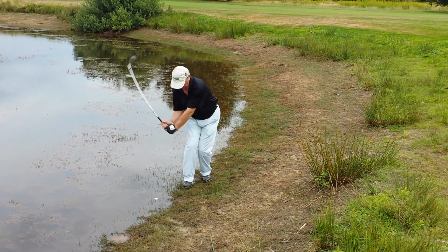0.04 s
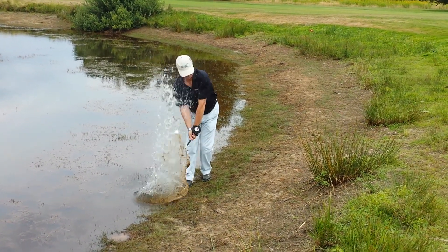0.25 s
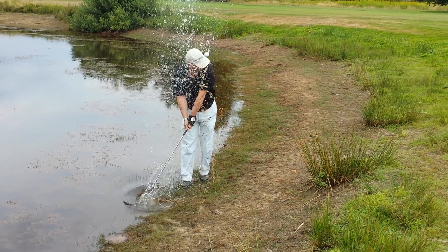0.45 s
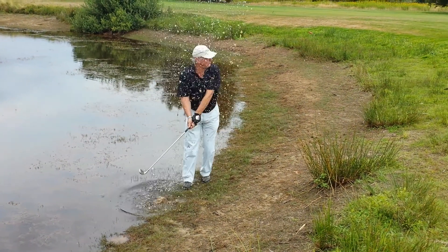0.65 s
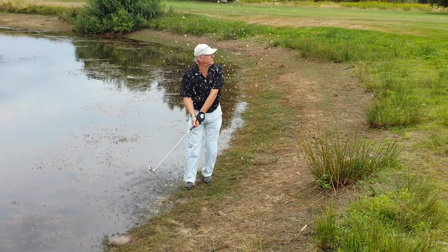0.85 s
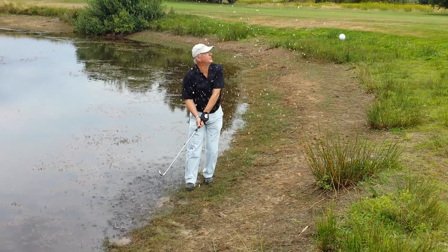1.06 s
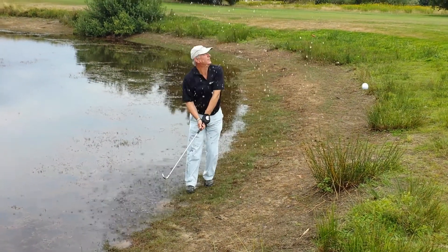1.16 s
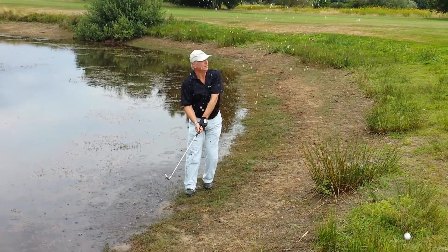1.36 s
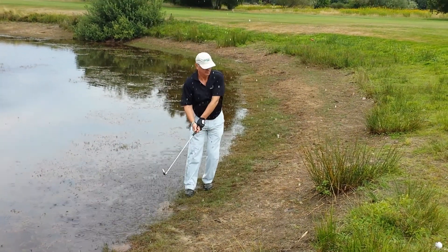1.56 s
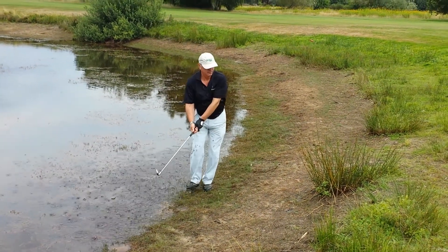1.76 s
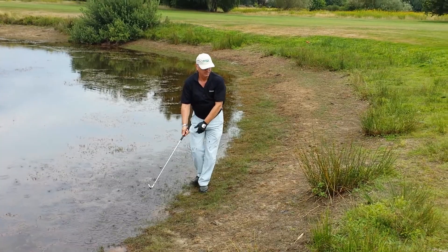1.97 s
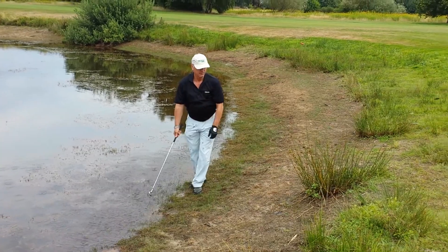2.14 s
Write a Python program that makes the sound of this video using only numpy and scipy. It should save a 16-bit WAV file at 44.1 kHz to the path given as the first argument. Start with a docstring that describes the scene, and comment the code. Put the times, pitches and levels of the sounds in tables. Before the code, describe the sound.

A golf shot from a pond: swish, sharp splashing crack, then falling drops.

```python
"""Light wind rumbles throughout. A faint rustle; a golf club swishes down, shedding vortices.
At 0.22 s the face cracks on a ball in the shallows of a pond and slaps the water.
Thrown water hisses up, rains back on the pond with a few plops, then patters on the near bank.
The ball thuds on turf at 1.5 s; a big drop lands with a ringing crack at 1.79 s.
Each microphone port adds its own colour."""
import sys
import numpy as np
from scipy import signal
from scipy.fft import rfft, irfft, next_fast_len
from scipy.io import wavfile
from scipy.ndimage import map_coordinates

SR = 44100
rng = np.random.default_rng(int(sys.argv[2]) if len(sys.argv) > 2 else 0)


def store_pcm(level_fs):
    """Save levels as 16-bit WAV."""
    pcm = np.round(np.clip(level_fs, -1, 1) * 32767).astype(np.int16)
    wavfile.write(sys.argv[1], SR, np.atleast_2d(pcm).T)


N = 97020

# envelopes: t/s, level/dB
WIND_ENVELOPE = [(0, -66.5), (.3, -53), (.9, -57.5), (1.28, -57), (1.9, -56), (2.2, -58)]
PATTER_ENVELOPE = [(.42, -110), (.5, -64), (.65, -44), (.86, -49.5), (1.02, -49), (1.13, -45.5),
                   (1.27, -48.5), (1.33, -36), (1.46, -42.5), (1.58, -36), (1.62, -53), (1.645, -38.5),
                   (1.81, -37), (1.86, -40), (1.95, -46.5), (2.03, -58), (2.2, -81)]  # small drops on the bank
TURF_ENVELOPE = [(.85, -85), (.92, -58), (1.2, -67), (1.38, -58.5), (1.6, -59), (2.0, -59), (2.08, -70.5)]  # their low thuds
# thrown water: t/s, fizz level/dB, splat level/dB
SPRAY_ENVELOPES = [(0, -68.5, -106), (.15, -78, -70), (.215, -66, -54.5), (.235, -41, -43.5),
                   (.29, -50.5, -55.5), (.37, -51, -53.5), (.41, -54, -65), (.452, -57.5, -58),
                   (.475, -43, -51), (.55, -44, -45.5), (.61, -41, -42.5), (.73, -40, -44), (.80, -43, -58),
                   (1.0, -44.5, -70), (1.35, -46, -60.5), (1.8, -45, -44), (1.95, -59, -67),
                   (2.08, -66.5, -76), (2.2, -62, -64)]
# club through air: t/s, vortex f/Hz, level/dB
SWISH_PATH = [(.14, 400, -102), (.168, 419, -59.5), (.181, 478, -46.5), (.191, 470, -53), (.203, 489, -54),
              (.212, 510, -38), (.218, 500, -39), (.226, 540, -92)]

# source spectra: f/Hz, level/dB
WIND_SPECTRUM = [(20, -21), (45, -6), (70, 0), (100, -6), (150, -14), (300, -23.5), (1500, -29.5),
                 (6000, -36), (14000, -36)]
SPLASHLET_SPECTRUM = [(300, -5.5), (600, -22.5), (1300, -2.5), (3800, -5.5), (9000, 1.5), (14000, 5)]
TURF_SPECTRUM = [(90, -15.5), (270, -2), (600, -13.5), (1100, -24.5)]
FIZZ_SPECTRUM = [(800, -14), (2000, -17.5), (3200, -2), (4300, -4.5), (6200, 0.5), (9000, -0.5), (14000, 0)]
SPLAT_SPECTRUM = [(150, -17), (450, -6.5), (800, -4), (1300, -1.5), (1900, 3), (3000, 2), (5000, -10)]
WHOOSH_SPECTRUM = [(80, 6), (260, 2), (700, -1), (1400, -21), (3000, -10), (6500, -30), (12000, -26)]

# big drops on the bank: t/s, level/dB, tick left-right/dB, pat trim/dB
BIG_DROPS = [(0.5627, -37, 12, -28), (.7275, -39, 2, 4), (.742, -36.5, 5, -7.5), (0.8327, -31, 6, -22),
             (0.837, -35, 0, -34), (.904, -28.5, 0, -29), (0.9519, -27.5, 4.5, -25), (1.09, -33, 3, -38),
             (1.1197, -25.5, 6, -29), (1.1609, -28, 2, -11.5), (1.1895, -30.5, 10, -46),
             (1.1921, -23, -3, -39), (1.227, -30.5, 3, -38), (1.2427, -33.5, 6, -11), (1.2891, -29, 2, -9),
             (1.3112, -28, 0, -21), (1.3229, -37, 10, -25), (1.3487, -34, -6, -27), (1.3655, -27, 1, -24),
             (1.3715, -28.5, 8, -9), (1.4009, -34.5, -10, -13), (1.46, -46, -5, -20),
             (1.5016, -22, -4, -12), (1.5072, -29, 2, -30), (1.5206, -22, 1.5, -24), (1.559, -25, 4, -22),
             (1.5643, -29, 15, -26), (1.598, -28.5, 7, -12), (1.636, -39, 3, -18),
             (1.6588, -30.5, 4.5, -16), (1.6683, -29, 3, -20), (1.6794, -23.5, 3, -13),
             (1.684, -26.5, 3, -7.5), (1.742, -28.5, 9, -5), (1.7534, -23, 6, -9), (1.757, -33, 3, -23),
             (1.7739, -30, -4, -35), (1.784, -19.5, 3.5, -21), (1.7868, -27.5, -1, -28),
             (1.797, -30, -1, -20), (1.8072, -30, 3, -30), (1.8265, -25.5, 3, -5), (1.831, -28, 4, -10),
             (1.8596, -31, 1, -31), (1.8877, -31, 1, -23), (1.8998, -28.5, -3, -17), (1.9148, -24, 2, -33),
             (1.9296, -28, 1, -11.5), (1.9534, -34, 4, -28), (1.9753, -35.5, -0.5, -22),
             (2.0075, -35, 5, -7.5), (2.06, -47, 0, -15), (2.149, -47, 4, -23), (2.1626, -41, 6, -8)]
# pond plops and a big drop's ringing crack: t/s, start f/Hz, level/dB, t60/s
SHORT_RINGS = [(0.271, 265, -43.5, 0.17), (.335, 924, -43.5, 0.025), (0.459, 486, -44, 0.031),
               (.536, 476, -42, 0.064), (.5753, 560, -32, 0.022), (.576, 408, -36, 0.093),
               (.585, 903, -41, 0.048), (.59, 1060, -46, 0.062), (.607, 645, -44, 0.067),
               (.722, 993, -46.5, 0.085), (1.7861, 3990, -2.5, 0.0056), (1.8355, 645, -26, 0.0063)]
# impact bands: low f/Hz, high f/Hz, level/dB, attack/s, t60/s
BALL_THUD_BANDS = [(162, 290, -34, .002, 0.055), (336, 670, -26.5, 0.00014, .016)]
WATER_SLAP_BANDS = [(44.6, 700, -43, 0.0054, 0.38), (141, 335, -17.5, 0.0062, 0.059),
                    (403, 670, -19, 0.0036, 0.055), (1110, 1140, -22, 0.001, 0.038),
                    (1800, 2500, -37, .003, 0.013), (2580, 2640, -18.5, 0.0021, 0.047),
                    (4740, 11300, -19.5, 0.00053, 0.046)]

# microphone port responses: f/Hz, level/dB
LEFT_PORT_RESPONSE = [(100, -2.5), (1400, 0.5), (1750, -11), (2000, -4.5), (2250, -23), (2700, -2),
                      (3300, 0.5), (4050, 1), (4500, -4), (5200, 10), (5950, 10.5), (6800, 2), (8200, -2.5),
                      (9400, -15), (10000, -0.5), (11500, -3.5), (13200, -3.5), (14400, -19.5)]
RIGHT_PORT_RESPONSE = [(100, 0.5), (1300, 1.5), (2000, 1), (2800, -3), (3450, -7), (4300, -2.5), (5400, 2),
                       (7000, 4), (8400, 7), (9400, 4.5), (10800, -1.5), (14000, -0.5)]
# left-right likeness: f/Hz, correlation
STEREO_CORRELATION = [(50, 0.73), (200, 0.74), (700, 0.72), (1500, 0.59), (3000, 0.24), (6000, 0.17),
                      (14000, 0.067)]


def amp(db):
    """Decibels to gain."""
    return 10 ** (np.asarray(db) / 20)


def unit(x):
    """Scale to rms 1."""
    return x / np.sqrt(np.mean(x ** 2) + 1e-20)


def along(points, hz):
    """Interpolate (f/Hz, value) rows on a log axis."""
    knots_hz, values = np.transpose(points)
    return np.interp(np.log(hz + 1), np.log(knots_hz + 1), values)


def curves(rows):
    """Per-sample curve of each column after t/s."""
    knots_s, *columns = np.transpose(rows)
    return [np.interp(np.arange(N) / SR, knots_s, column) for column in columns]


def wobble(knots_per_s):
    """Smooth random curve, rms near 1."""
    knots = rng.standard_normal(N // 100)
    return map_coordinates(knots, [np.arange(N) * knots_per_s / SR], mode="mirror")


def coloured(x, spectrum):
    """Minimum-phase filter from (f/Hz, level/dB) rows."""
    n = x.shape[-1]
    n_fft = 2 * next_fast_len(n)
    gain = amp(along(spectrum, np.fft.rfftfreq(n_fft, 1 / SR)))
    cepstrum = irfft(np.log(np.maximum(gain, 1e-6)), n_fft)
    cepstrum[1:n_fft // 2] *= 2
    cepstrum[n_fft // 2 + 1:] = 0
    return irfft(rfft(x, n_fft) * np.exp(rfft(cepstrum)), n_fft)[..., :n]


def stereo(pair):
    """Two unrelated signals to left and right: alike in the bass, less so in the treble."""
    n = pair.shape[-1]
    correlation = along(STEREO_CORRELATION, np.fft.rfftfreq(n, 1 / SR))
    angle_rad = np.arccos(np.clip(correlation, -1, 1)) / 2
    mid, side = irfft(rfft(pair) * [np.cos(angle_rad), np.sin(angle_rad)], n)
    return np.array([mid + side, mid - side])


def add(out, start_s, x):
    """Mix x in at start_s."""
    part = out[:, round(start_s * SR):][:, :x.shape[-1]]
    part += x[..., :part.shape[1]]


def burst(low_hz, high_hz, attack_s, t60_s, n=16384):
    """Decaying stereo noise in one band."""
    t, hz = np.arange(n) / SR, np.fft.rfftfreq(n, 1 / SR)
    band = 1 / np.sqrt((1 + (low_hz / (hz + 1)) ** 10) * (1 + (hz / high_hz) ** 10))
    envelope = (1 - np.exp(-t / attack_s)) * amp(-60 * t / t60_s)
    noise = irfft(rfft(rng.standard_normal((2, n))) * band)
    puff = stereo(noise) * envelope
    return puff * np.linalg.norm(envelope) / np.linalg.norm(puff, axis=1, keepdims=True)


def shower(spectrum, hits_per_s, spread_db):
    """Random droplet impacts of mixed sizes; rms 1."""
    hits = rng.random((2, N)) < hits_per_s / SR
    size = np.clip(rng.standard_normal((2, N)), -2, 2)
    polarity = np.sign(rng.standard_normal((2, N)))
    return unit(stereo(coloured(hits * amp(spread_db * size) * polarity, spectrum)))


def pings(count, centre_hz, spread_oct, t60_cycles, spread_db=5.5):
    """Tiny damped rings, random in time, pitch, size and pan; rms 1."""
    out, t = np.zeros((2, N)), np.arange(700) / SR
    sides = np.array([[1], [-1]])
    starts_s = rng.random(count) * N / SR
    draws = np.clip(rng.standard_normal((count, 4)), -2, 2)
    for start_s, (pitch, size, pan, skew_rad) in zip(starts_s, draws):
        cycles = centre_hz * 2 ** (spread_oct * pitch) * t
        ring = np.sin(2 * np.pi * cycles + sides * skew_rad / 2)
        level_db = spread_db * size + 1.5 * (pitch + sides * pan)
        add(out, start_s, amp(level_db - 60 * cycles / t60_cycles) * ring)
    return unit(out)


def wind(gust_db=3):
    """Light wind at the microphone: low rumble, faint hiss."""
    noise = coloured(rng.standard_normal((2, N)), WIND_SPECTRUM)
    level_db = curves(WIND_ENVELOPE)[0] + gust_db * wobble(10.6)
    return amp(level_db) * unit(stereo(noise))


def rustle(start_s=0.006, level_db=-57.5):
    """Faint rustle as the swing begins."""
    out = np.zeros((2, N))
    add(out, start_s, amp(level_db) * burst(1870, 7200, attack_s=0.0065, t60_s=0.2))
    return out


def patter():
    """Small drops click on the bank, each at its own pitch, and thud softly into turf."""
    clicks = amp(-3) * pings(count=900, centre_hz=7020, spread_oct=0.58, t60_cycles=10.3)
    splashlets = amp(-2) * shower(SPLASHLET_SPECTRUM, hits_per_s=380, spread_db=6)
    thuds = shower(TURF_SPECTRUM, hits_per_s=380, spread_db=5)
    patter_db, turf_db = curves(PATTER_ENVELOPE)[0], curves(TURF_ENVELOPE)[0]
    return amp(patter_db) * (clicks + splashlets) + amp(turf_db) * thuds


def big_drops(tick_gain_db=10, pat_gain_db=7):
    """Big drops hit the bank: sharp tick, brief spatter, dull pat."""
    out = np.zeros((2, N))
    draws = rng.uniform(-1, 1, (len(BIG_DROPS), 2))
    for (start_s, level_db, pan_db, pat_trim_db), (colour, length) in zip(BIG_DROPS, draws):
        tick_low_hz = 3370 * 2 ** (0.083 * colour)
        tick_t60_s = 0.0027 * 2 ** (0.12 * length)
        tick = burst(tick_low_hz, 14200, attack_s=0.0001, t60_s=tick_t60_s, n=2048)
        spatter = amp(-14) * burst(2400, 10000, attack_s=0.00033, t60_s=0.014, n=2048)
        pat = burst(1030, 3080, attack_s=0.00016, t60_s=0.011, n=2048)
        pan = amp([[pan_db / 2], [-pan_db / 2]])
        drop = amp(tick_gain_db) * (tick + spatter) * pan + amp(pat_gain_db + pat_trim_db) * pat
        add(out, start_s, amp(level_db) * drop)
    return out


def ball_thud(start_s=1.5006):
    """The ball lands on soft turf."""
    out = np.zeros((2, N))
    for low_hz, high_hz, level_db, attack_s, t60_s in BALL_THUD_BANDS:
        add(out, start_s, amp(level_db) * burst(low_hz, high_hz, attack_s, t60_s))
    return out


def short_rings(attack_s=0.00033, pitch_rise_per_s=1.38):
    """Damped, slightly rising tones: plops in the pond, a big drop's sharp ringing crack at 1.79 s."""
    out, t = np.zeros((2, N)), np.arange(SR // 4) / SR
    for start_s, start_hz, level_db, t60_s in SHORT_RINGS:
        envelope = amp(level_db - 60 * t / t60_s) * (1 - np.exp(-t / attack_s))
        cycles = start_hz * t * (1 + pitch_rise_per_s * t / 2)
        add(out, start_s, envelope * np.sin(2 * np.pi * cycles))
    return out


def spray():
    """The water sheet tears: mist fizzes with tiny bubbles, heavier water splats on the pond."""
    fizz_db, splat_db = curves(SPRAY_ENVELOPES)
    bubbles = amp(-5) * pings(count=1400, centre_hz=4770, spread_oct=0.638, t60_cycles=57)
    fizz = shower(FIZZ_SPECTRUM, hits_per_s=5000, spread_db=5.5) + bubbles
    splats = shower(SPLAT_SPECTRUM, hits_per_s=900, spread_db=5)
    return amp(fizz_db + wobble(90)) * fizz + amp(splat_db + wobble(60.8)) * splats


def swish(whoosh_db=-2.5):
    """The club sheds vortices: a breathy tone that rises with its speed."""
    vortex_hz, level_db = curves(SWISH_PATH)
    wavering_hz = vortex_hz * (1 + 0.0544 * wobble(150))
    tone = np.sin(2 * np.pi * np.cumsum(wavering_hz) / SR)
    whoosh = stereo(coloured(rng.standard_normal((2, N)), WHOOSH_SPECTRUM))
    flutter_db = 0.63 * wobble(117)
    return amp(level_db + flutter_db) * (unit(tone) + amp(whoosh_db) * unit(whoosh))


def strike(start_s=0.2182, crack_left_db=-13.5, crack_right_db=-8.5):
    """The club face cracks on the ball and slaps the water open."""
    out = np.zeros((2, N))
    crack = burst(2330, 9900, attack_s=0.00004, t60_s=0.0025)
    add(out, start_s, amp([[crack_left_db], [crack_right_db]]) * crack)
    for low_hz, high_hz, level_db, attack_s, t60_s in WATER_SLAP_BANDS:
        add(out, start_s, amp(level_db) * burst(low_hz, high_hz, attack_s, t60_s))
    return out


def scene():
    """The shot and its short scatter from the bank, over wind."""
    direct = rustle() + swish() + strike()
    direct += spray() + short_rings() + patter() + big_drops() + ball_thud()
    bank_ir = burst(72, 15000, attack_s=0.012, t60_s=0.051)
    bank_ir /= np.linalg.norm(bank_ir[0])
    scatter = signal.fftconvolve(direct, bank_ir, axes=1)[:, :N]
    return direct + amp(-15.5) * scatter + wind()


def record(dry):
    """Each microphone port rings in its own way; the right is reached first; steep low-pass."""
    right_lead_s, cutoff_hz, edge_hz = 0.00006, 14600, 260
    left = coloured(dry[0], LEFT_PORT_RESPONSE)
    right = coloured(dry[1], RIGHT_PORT_RESPONSE)
    n_fft = next_fast_len(N + SR // 4)
    hz = np.fft.rfftfreq(n_fft, 1 / SR)
    lag = np.exp(1j * np.pi * hz * right_lead_s * np.array([[-1], [1]]))
    low_pass = 1 / (1 + np.exp(2 * (hz - cutoff_hz) / edge_hz))
    return irfft(rfft([left, right], n_fft) * lag * low_pass, n_fft)[:, :N]


dry = scene()
out = record(dry)
store_pcm(out)
```